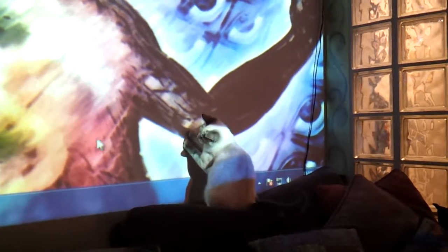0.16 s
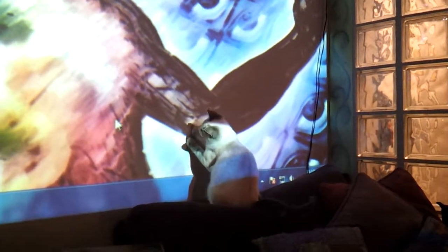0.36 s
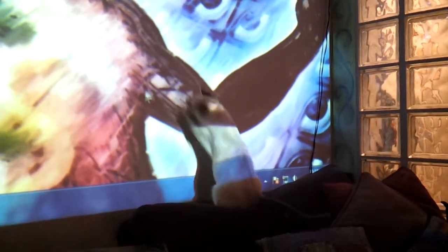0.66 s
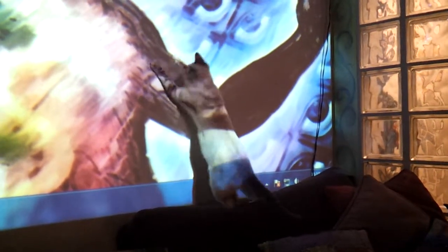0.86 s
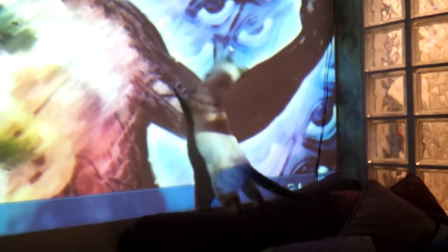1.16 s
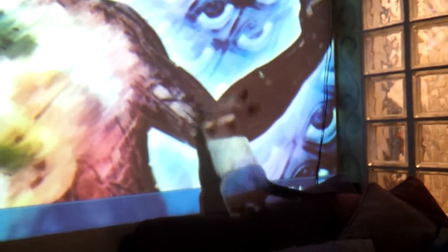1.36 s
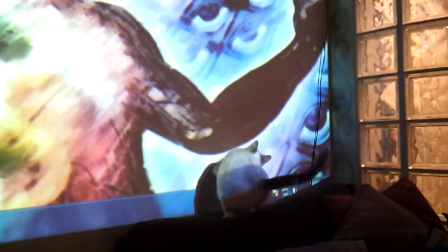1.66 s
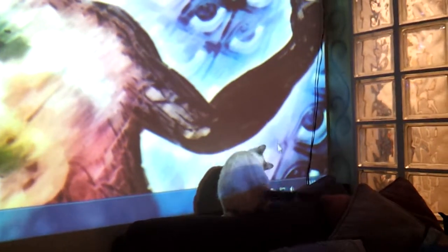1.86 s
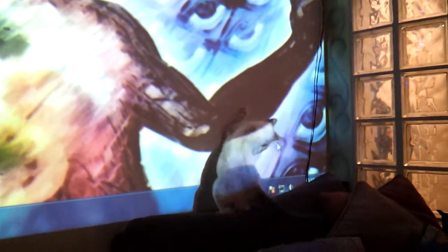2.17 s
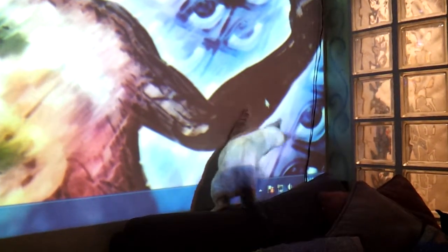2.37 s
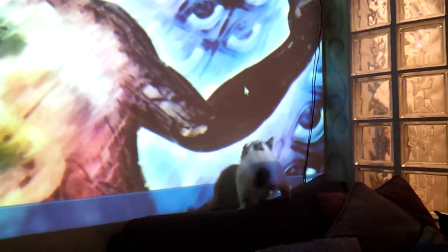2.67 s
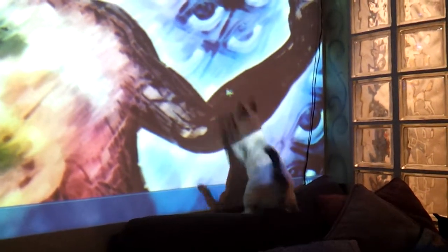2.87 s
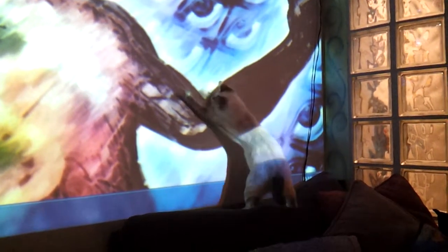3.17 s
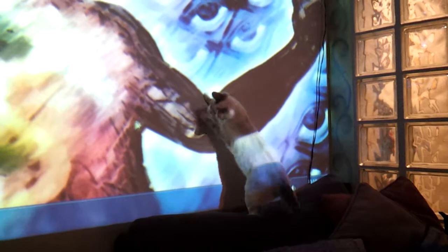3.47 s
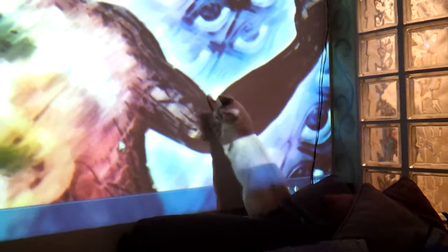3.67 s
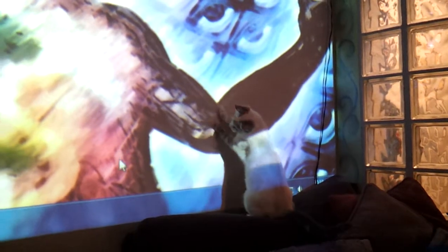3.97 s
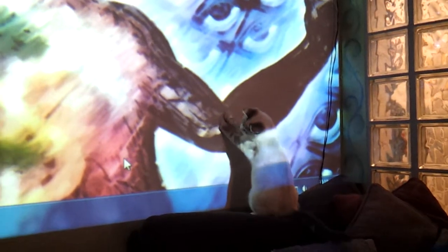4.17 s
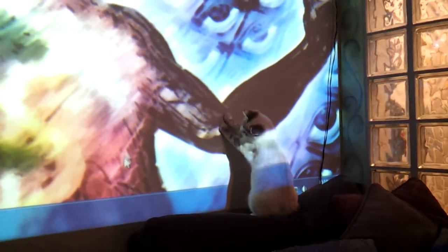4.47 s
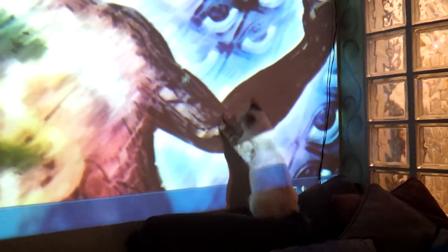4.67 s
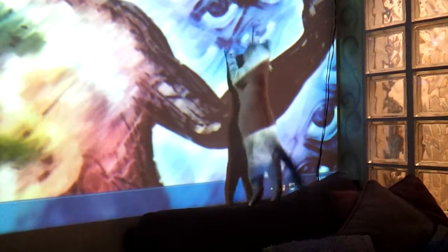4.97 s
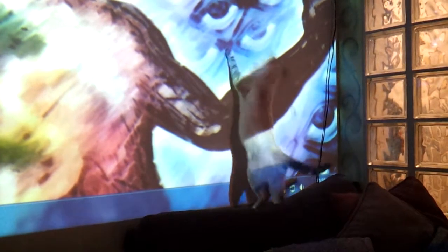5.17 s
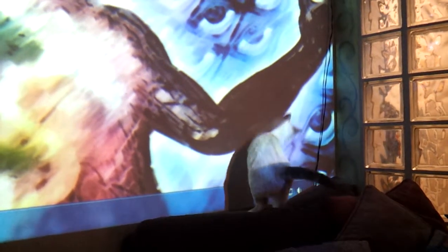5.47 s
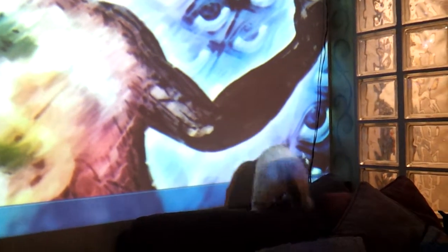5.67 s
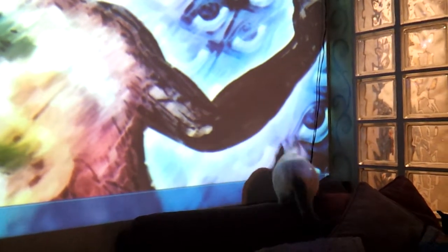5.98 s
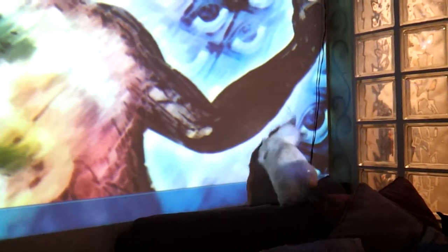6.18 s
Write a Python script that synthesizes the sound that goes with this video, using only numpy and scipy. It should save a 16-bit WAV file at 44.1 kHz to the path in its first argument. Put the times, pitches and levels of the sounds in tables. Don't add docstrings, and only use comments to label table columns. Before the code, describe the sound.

Sparse paw taps and short scratchy drags on a wall over faint fan hiss, with one sharp, clattering knock near the end.

```python
import sys
import numpy as np
from scipy import signal
from scipy.fft import rfft, irfft, next_fast_len
from scipy.io import wavfile

SR = 44100
rng = np.random.default_rng(int(sys.argv[2]) if len(sys.argv) > 2 else 0)


def bounce(signal):
    frames = np.transpose(np.atleast_2d(signal))
    limited = np.clip(frames, -1, 1)
    pcm = np.round(limited * 32767).astype(np.int16)
    wavfile.write(sys.argv[1], SR, pcm)


def undo_db(level):
    steps = np.asarray(level, float) / 20
    return 10 ** steps


N = 279163

# pitch_hz, level_db (per Hz)
FAN_AIR = [(15, -56), (25, -20.5), (113, -8.5), (144, -9), (183, -7.5), (253, -12.5), (350, -10),
           (458, -12.5), (553, -13), (600, -14.5), (898, -15), (1060, -17.5), (4280, -26), (7540, -29),
           (15600, -32)]
FAN_AIR_DB = -61.5
# pitch_hz, width_hz, level_db (rms)
FAN_HUMS = [(190, 16.3, -69.5), (550, 14, -78), (6380, 1400, -73), (13000, 4400, -79.5)]
# pitch_hz, level_db (rms)
LAMP_WHINE = [(7320, -84), (7600, -89)]
# start_s, end_s
LAMP_ON = [(-.1, .23), (3.36, 3.68), (3.9, 4.2)]
LAMP_FADE_S = 0.11
# t60_s, level_db
ROOM_TAILS = [
    (0.35, -12.5),
    (0.26, -14),
    (0.17, -11.5),
]
# pitch_hz, width_hz, level_db
BRIGHT_PORT = [(6900, 1380, 21.5), (4220, 5700, 12.5), (8000, 2000, 11)]

# start_s, peak_db, pitch_hz, t60_s
THUMPS = [(0.549, -74, 72.7, 0.2), (0.79, -55, 60, 0.35), (1.037, -48, 66, 0.21), (1.446, -76, 108, 0.2),
          (2.525, -67, 91.5, 0.2), (2.659, -60, 85, 0.14), (2.804, -63, 106, 0.16), (2.964, -54, 67.3, 0.2),
          (3.203, -60, 75.4, 0.2), (4.593, -61.5, 108, 0.22), (4.981, -51, 63.6, 0.28),
          (6.119, -66, 37.7, 0.2)]
# start_s, peak_db, pitch_hz, t60_s
DULL_KNOCKS = [(.953, -54.5, 1155, 0.11), (2.57, -54, 224, 0.087), (2.828, -50.5, 190, 0.12),
               (2.835, -50.5, 345, 0.082)]
# start_s, level_db (rms), pitch_hz, t60_s
PANEL_ANSWERS = [(1.034, -58, 1450, 0.11), (1.151, -67.5, 1280, 0.92), (1.9, -64.5, 1950, .4),
                 (2.358, -55, 1660, 0.14), (2.36, -58.5, 550, 0.22), (2.601, -64.5, 300, .9),
                 (2.83, -56, 600, 0.15), (3.21, -59, 1190, 0.09), (4.979, -50, 5030, 0.17),
                 (5.05, -61, 120, .3), (5.501, -62, 130, 0.48), (5.62, -63, 294, 0.64),
                 (5.741, -63, 4500, 0.09), (5.97, -62, 270, .33), (6.04, -56.5, 870, 0.18),
                 (6.041, -63, 1790, .2)]
PANEL_Q = 1.8
# start_s, level_db (rms), pitch_hz
CLAW_RINGS = [(1.035, -54, 10400), (1.42, -59, 13800), (2.961, -41.5, 7400), (2.96, -48, 11500),
              (2.96, -50, 9900), (3.083, -56, 10500), (3.208, -47, 6800), (3.208, -45, 6250)]
CLAW_Q, CLAW_T60_S = 16, 0.13
# start_s, level_db (rms), pitch_hz
SQUEAKS = [
    (4.598, -60, 1985),
    (4.632, -62.5, 6230),
]
SQUEAK_Q, SQUEAK_T60_S = 5.5, 0.45

# start_s, peak_db, crack_db (re peak), clatter_db (re peak), clatter_t60_s
KNOCKS = [
    (5.378, -19, 3, -12, 0.18),
    (5.621, -33.5, -2.5, -6, 0.072),
]
# pitch_hz, one row per knock
MODE_HZ = [
    (546, 985, 1355, 1515, 2160, 2704, 4597, 6193, 6267),
    (520, 1044, 1351, 1545, 1590, 1780, 6230, 6270),
]
# level_db, t60_s
FIRST_MODES = [(-24.5, 0.13), (-30.5, 0.13), (-22, 0.076), (-20.5, 0.23), (-30, 0.2), (-29, 0.088),
               (-28, 0.085), (-23, 0.096), (-11, 0.06)]
SECOND_MODES = [(-18.5, 0.07), (-25, 0.16), (-20.5, 0.075), (-19, 0.24), (-16.5, 0.18), (-22, .1),
                (-14, 0.035), (-17.5, 0.09)]
# pitch_hz, level_db (per Hz)
FIRST_CLATTER = [(120, -54), (250, -10.5), (540, -4), (1090, -1), (1540, 5.5), (2200, -3.5), (3940, -5.5),
                 (5800, -2), (6800, -4.5), (7500, -15.5), (9500, -25.5), (12000, -44), (22000, -100)]
SECOND_CLATTER = [(150, -45), (400, 0), (1000, -6), (1600, 3.5), (2300, -6.5), (4000, -13), (6300, -11),
                  (7500, -16), (12000, -59), (22000, -100)]
SWELL_S = 0.0028
HIGH_MODE_HZ = 6000
LOW_TAIL_DB, HIGH_TAIL_DB, MODE_TAIL_T60_S = -17, -15, 0.38

# start_s, peak_db, top_band_db (sharpness), middle_band_db (pad share)
CLAW_TAPS = [(0.597, -56, -18, -20), (0.781, -39, -15, -19), (0.814, -38, -24, -17),
             (1.035, -30.5, -11, -26), (1.447, -32, -27, -33), (2.8308, -52.5, -20, -1.5),
             (2.9605, -26, -5.5, -40), (3.083, -39, -4, -26), (3.2093, -26.5, -21, -26),
             (4.572, -58.5, -18, 6), (4.597, -54, -19, -6), (4.9267, -44, -13, -18), (4.978, -38, -12, -14),
             (5.041, -50, -14, -8), (5.1242, -57, -20, -16), (5.2629, -49, -19, -26),
             (5.9894, -58.5, -15, 1.5), (6.2457, -54, -13, -17)]
TAP_RISE_S = 0.0011
TAP_T60_S, TAP_SHORTER_PER_DB = 0.048, 0.02
# start_s, peak_db, top_band_db, middle_band_db, rise_s
PAD_BRUSHES = [(.705, -53.5, -16, -17, 0.021), (1.177, -48.5, -7, -25, .024),
               (1.31, -49.5, -13, -26, 0.027), (1.366, -42, -22, -34, 0.02), (1.429, -35, -8, -41, 0.016),
               (2.188, -45.5, -14, -20, 0.022), (3.85, -46, -23, -42, 0.014),
               (4.794, -42, -11, -13, 0.0071), (5.089, -46.5, -9, -18, 0.0095),
               (5.362, -51.5, -23, -12, .012), (5.455, -48.5, -6, -8, .011),
               (6.128, -45.5, -14, -37, 0.017)]
BRUSH_DECAY_PER_RISE = 4.2
# start_s, hold_s, rub_db, top_band_db, middle_band_db
SKIDS = [(0.817, .025, -54.5, -14, -18), (0.92, .04, -51, -15, -14), (1.865, 0.17, -61.5, -15, -11),
         (2.96, .02, -47.5, -1, -20), (3.085, 0.075, -49.5, -6, -22), (4.6, 0.075, -67, -12, 3),
         (5.262, 0.022, -53.5, -6, -25)]
SKID_ATTACK_S, SKID_SAG_DB_PER_S, SKID_RELEASE_DB_PER_S = 0.01, 60, 400
# time_s, pressure_db, pad_share (0 claw tip, 1 flat pad)
DRAGS = [
    [(1.44, -43.5, 0), (1.528, -53, .35), (1.642, -45, .15), (1.675, -73, .3), (1.72, -66, .5)],
    [(2.2, -68, 0.8), (2.25, -63.5, 0.83), (2.326, -51, .55), (2.366, -49, 0.82), (2.514, -47.5, 0.36),
     (2.552, -48.5, 0.1), (2.6, -73, 0.85), (2.68, -65, 0.96)],
]
DRAG_TOP_DB, CLAW_MIDDLE_DB, PAD_MIDDLE_DB = -13.5, -29.5, 1

CUTOFF_HZ = 15540
# centre_s, pitch_hz
UNMATCHED_BANDS = [(.16, 5800), (.23, 4950), (.37, 9000), (.555, 6300), (1.275, 6950), (1.275, 10350),
                   (1.507, 6650), (1.507, 13100), (1.878, 6300), (2.435, 5200), (2.435, 11700),
                   (2.482, 8300), (3.736, 9000), (4.872, 6650), (4.872, 13800), (6.29, 5250), (6.29, 7600)]
UNMATCHED_HALF_WIDTH_HZ = 700


def rms_one(x):
    return x / np.sqrt(np.mean(x ** 2) + 1e-20)


def band(x, low_hz, high_hz, order=2):
    return signal.sosfilt(signal.butter(order, [low_hz, high_hz], "band", fs=SR, output="sos"), x)


def resonance(x, hz, width_hz):
    r = np.exp(-np.pi * width_hz / SR)
    poles = [1, -2 * r * np.cos(2 * np.pi * hz / SR), r * r]
    return signal.lfilter((1 - r * r) / 2 * np.array([1, 0, -1]), poles, x)


def ring(clicks, hz, t60):
    r, w = undo_db(-60 / (t60 * SR)), 2 * np.pi * hz / SR
    return signal.lfilter([0, np.sin(w)], [1, -2 * r * np.cos(w), r * r], clicks + 1e-18)


def coloured(spectrum, size):
    hz, db = np.transpose(spectrum)
    axis = np.arange(size // 2 + 1) * SR / size + 1
    gain = undo_db(np.interp(np.log(axis), np.log(hz), db))
    return rms_one(irfft(rfft(rng.standard_normal(size)) * gain, size))


def fan():
    t = np.arange(N) / SR
    air = undo_db(FAN_AIR_DB) * coloured(FAN_AIR, next_fast_len(N))[:N]
    hums = sum(undo_db(db) * rms_one(resonance(rng.standard_normal(N), hz, width))
               for hz, width, db in FAN_HUMS)
    whine = sum(undo_db(db + 7) * np.sin(2 * np.pi * hz * t) for hz, db in LAMP_WHINE)
    lamp_on = sum(np.clip(np.minimum(t - start, end - t) / LAMP_FADE_S + 0.5, 0, 1)
                  for start, end in LAMP_ON)
    return air + hums + whine * lamp_on


def room(force):
    tails = []
    for f, (t60, db) in zip(force, ROOM_TAILS):
        r = undo_db(-120 / (t60 * SR))
        power = signal.lfilter([1 - r], [1, -r], f ** 2 + 1e-18)
        tails.append(undo_db(db + 10.0) * np.sqrt(power))
    return tails


def thumps():
    out = np.zeros(N)
    for s, db, hz, t60 in list(THUMPS) + list(DULL_KNOCKS):
        push = np.hanning(int(0.4 * SR / hz) + 3)
        clicks = np.zeros(SR // 2)
        clicks[:len(push)] = undo_db(db + 2.0) * push / push.sum()
        start = round(s * SR)
        out[start:start + SR // 2] += ring(clicks, hz, max(t60, 0.01))[:N - start]
    return out


def hollows():
    out, size = np.zeros(N), SR // 3
    t = np.arange(size) / SR
    claws = [(s, db, hz, hz / CLAW_Q, CLAW_T60_S) for s, db, hz in CLAW_RINGS]
    panel = [(s, db, hz, hz / PANEL_Q, t60) for s, db, hz, t60 in PANEL_ANSWERS]
    squeaks = [(s, db, hz, hz / SQUEAK_Q, SQUEAK_T60_S) for s, db, hz in SQUEAKS]
    for s, db, hz, width, t60 in claws + panel + squeaks:
        tone = rms_one(resonance(resonance(rng.standard_normal(size), hz, width), hz, width))
        envelope = undo_db(db - 60 * t / t60) * np.minimum(t / 0.0014, 1)
        start = round(s * SR)
        out[start:start + size] += (envelope * tone)[:N - start]
    return out


def object_modes(t, pitches, modes):
    body = 0
    for hz, (db, t60) in zip(pitches, modes):
        drift = rng.standard_normal(len(t) + 2000)
        waver = signal.lfilter([1], [1, -1.988, .988036], drift)[2000:]
        level = undo_db(db + 3.3 * rms_one(waver))
        direct = undo_db(-60 * np.maximum(t - 0.02, 0) / t60)
        tail_db = HIGH_TAIL_DB if hz > HIGH_MODE_HZ else LOW_TAIL_DB
        tail = undo_db(tail_db - 60 * t / MODE_TAIL_T60_S)
        body = body + level * (direct + tail) * np.sin(2 * np.pi * hz * t + 6 * rng.random())
    return body


def knocks():
    out, size = np.zeros(N), SR // 2
    t = np.arange(size) / SR
    swell = 1 - np.exp(-t / SWELL_S)
    sounds = zip(KNOCKS, MODE_HZ, (FIRST_MODES, SECOND_MODES), (FIRST_CLATTER, SECOND_CLATTER))
    for (s, db, crack_db, clatter_db, t60), pitches, modes, colour in sounds:
        blow = (t == 0) * undo_db(crack_db)
        snap = ring(blow, 3940, 0.0029)
        snap = snap + undo_db(-7.5) * ring(blow, 7700, 0.0036)
        snap = snap + undo_db(-19) * ring(blow, 547, 0.027)
        crack = -undo_db(3.0) * band(snap, 310, 7300)
        fade = undo_db(clatter_db - 60 * t / t60) + undo_db(clatter_db - 14.5 - 60 * t / 0.61)
        clatter = coloured(colour, size) * fade
        body = object_modes(t, pitches, modes)
        start = round(s * SR)
        out[start:start + size] += undo_db(db) * (crack + (clatter + body) * swell)[:N - start]
    return out


def three_bands(x):
    bright = sum(undo_db(db) * resonance(x, hz, width) * (-1) ** k
                 for k, (hz, width, db) in enumerate(BRIGHT_PORT))
    main = band(bright, 3720, 9080, order=3)
    top = resonance(band(x, 9500, 14600), 11500, 6000)
    middle = band(x, 1400, 4300)
    return [rms_one(v) for v in (main, top, middle)]


def contact(s, rise, decay):
    t = np.arange(SR // 4) / SR
    rise, decay = max(rise, 2e-4), max(decay, 2e-3)
    shape = np.minimum(t / rise, 1) * undo_db(-60 * np.maximum(t - rise, 0) / decay)
    start = round((s - rise) * SR)
    return start, shape[:N - start]


def touches(force):
    taps = [(*row, TAP_RISE_S, TAP_T60_S * (1 - TAP_SHORTER_PER_DB * (row[1] + 40)))
            for row in CLAW_TAPS]
    brushes = [(*row, BRUSH_DECAY_PER_RISE * row[-1]) for row in PAD_BRUSHES]
    for s, db, top_db, middle_db, rise, decay in taps + brushes:
        start, shape = contact(s, rise, decay)
        levels_db = np.array([[db], [db + top_db + 1.5], [db + middle_db]])
        force[:, start:start + len(shape)] += undo_db(levels_db - 8.5) * shape


def strokes(force):
    t = np.arange(N) / SR
    for s, hold, db, top_db, middle_db in SKIDS:
        age = np.maximum(t - s, 0)
        fall_db = SKID_SAG_DB_PER_S * age + SKID_RELEASE_DB_PER_S * np.maximum(age - hold, 0)
        levels_db = np.array([[db], [db + top_db], [db + middle_db]])
        force += undo_db(levels_db - 6.0) * np.minimum(age / SKID_ATTACK_S, 1) * undo_db(-fall_db)
    for rows in DRAGS:
        s, db, pad = np.transpose(rows)
        edges = np.clip(np.minimum(t - s[0], s[-1] - t) / SKID_ATTACK_S, 0, 1)
        rub = edges * undo_db(np.interp(t, s, db) - 3.0)
        middle_db = CLAW_MIDDLE_DB + (PAD_MIDDLE_DB - CLAW_MIDDLE_DB) * np.interp(t, s, pad)
        force += [rub, rub * undo_db(DRAG_TOP_DB), rub * undo_db(middle_db)]


def paws():
    force = np.zeros((3, N))
    touches(force)
    strokes(force)
    grip = rms_one(band(rng.standard_normal(N), 38, 510))
    slips = rng.standard_normal(N) * undo_db(2.0 * rng.exponential(1, N) + 1.6 * grip)
    direct = sum(f * layer for f, layer in zip(force, three_bands(slips)))
    diffuse_noise = three_bands(rng.standard_normal(N))
    diffuse = sum(f * layer for f, layer in zip(room(force), diffuse_noise))
    return direct + diffuse


def scene():
    mono = fan() + thumps() + hollows() + knocks() + paws()
    return np.stack([mono, mono])


def top_cut(x):
    return signal.sosfilt(signal.butter(12, 16310, fs=SR, output="sos"), x)


def record(dry):
    cut = signal.sosfilt(signal.ellip(10, 0.3, 60, CUTOFF_HZ, fs=SR, output="sos"), dry)
    side = undo_db(-100) * rms_one(band(rng.standard_normal(N), 20, 70))
    size = 2048
    for s, hz in UNMATCHED_BANDS:
        low_hz, high_hz = hz - UNMATCHED_HALF_WIDTH_HZ, hz + UNMATCHED_HALF_WIDTH_HZ
        start = round(s * SR) - size // 2
        level = np.std(band(cut[0, start:start + size], low_hz, high_hz, order=4))
        noise = rms_one(band(rng.standard_normal(size), low_hz, high_hz, order=8))
        side[start:start + size] += undo_db(-2.0) * level * noise * np.hanning(size)
    return top_cut(cut + side * [[1], [-1]])


dry = scene()
out = record(dry)
bounce(out)
```